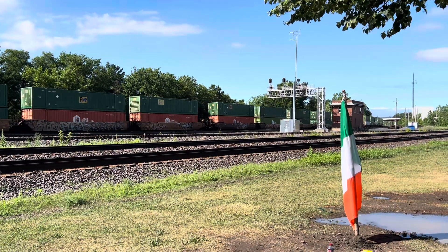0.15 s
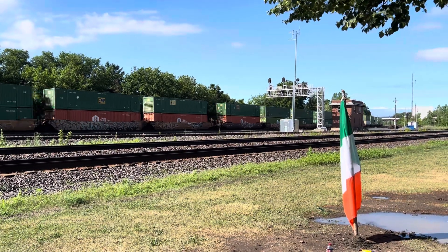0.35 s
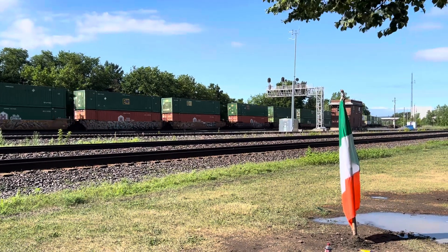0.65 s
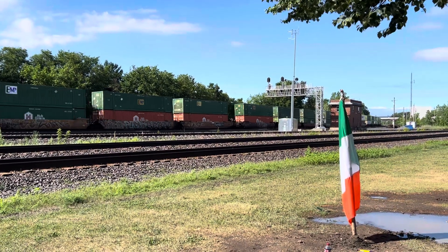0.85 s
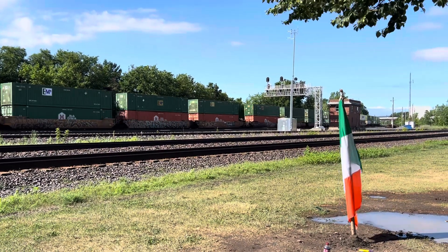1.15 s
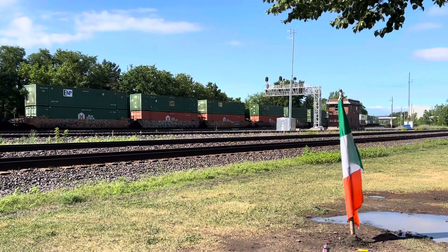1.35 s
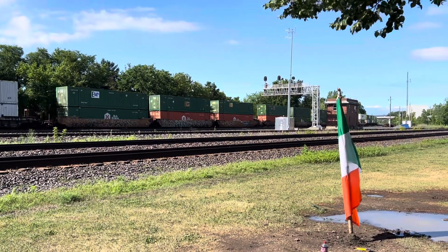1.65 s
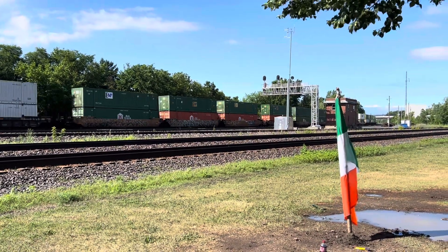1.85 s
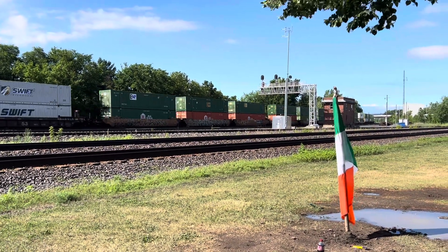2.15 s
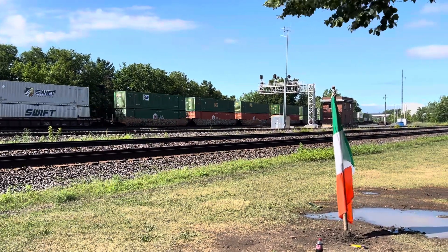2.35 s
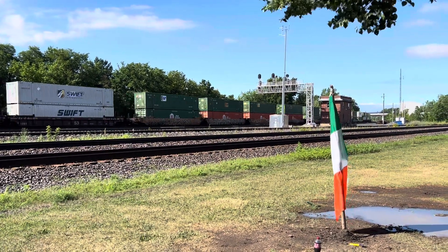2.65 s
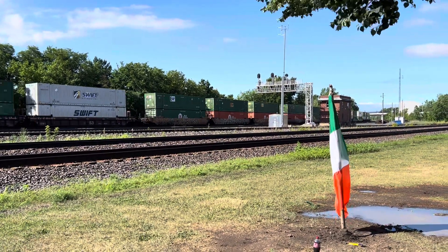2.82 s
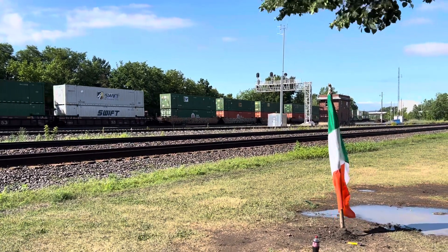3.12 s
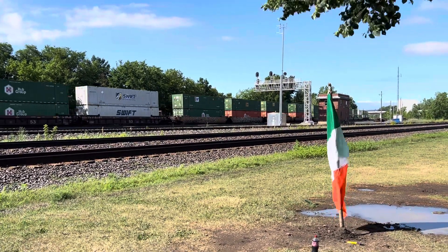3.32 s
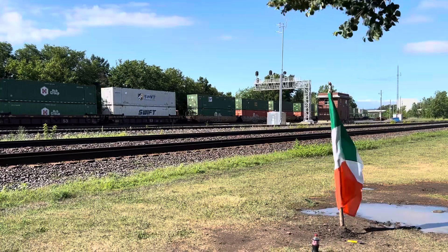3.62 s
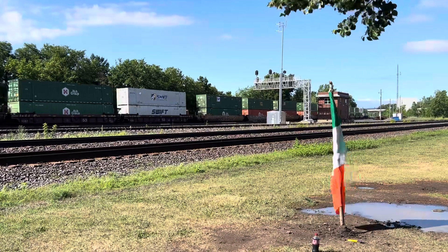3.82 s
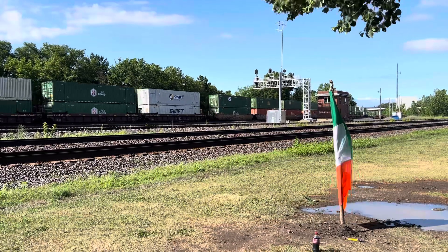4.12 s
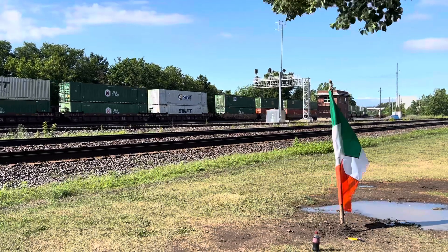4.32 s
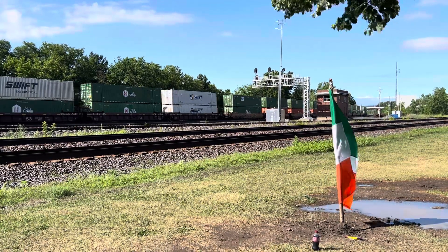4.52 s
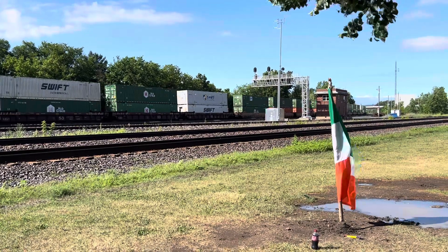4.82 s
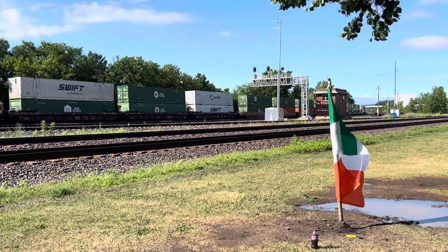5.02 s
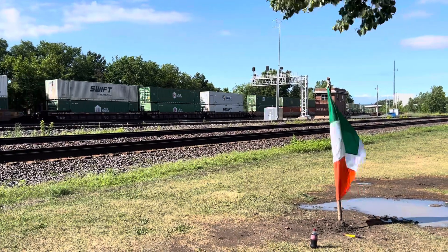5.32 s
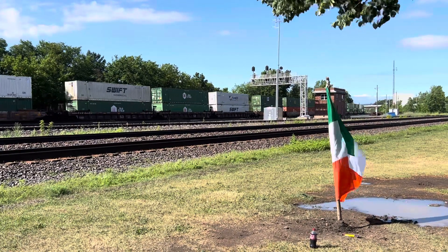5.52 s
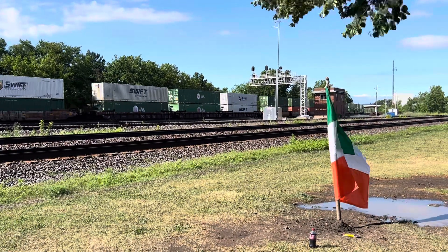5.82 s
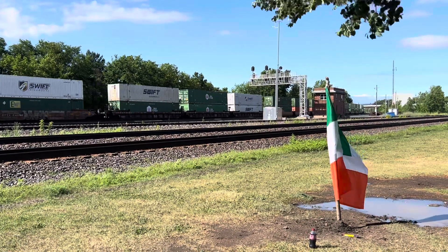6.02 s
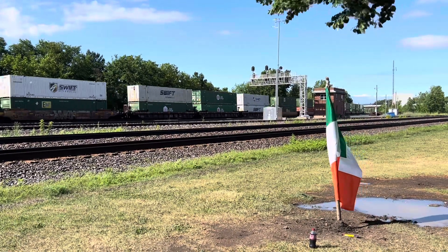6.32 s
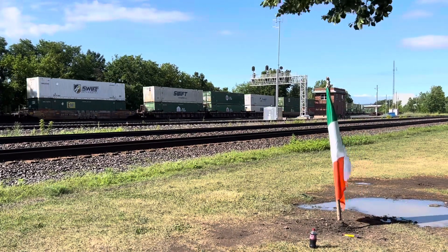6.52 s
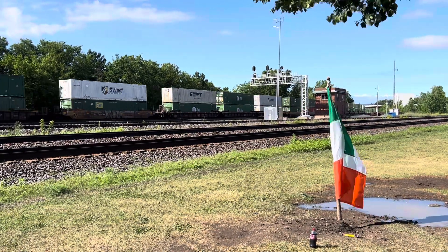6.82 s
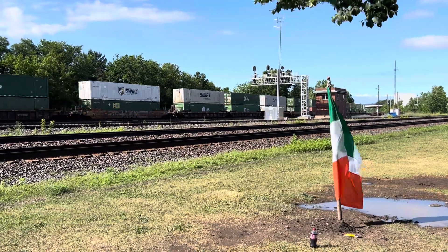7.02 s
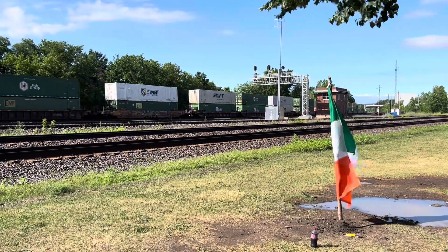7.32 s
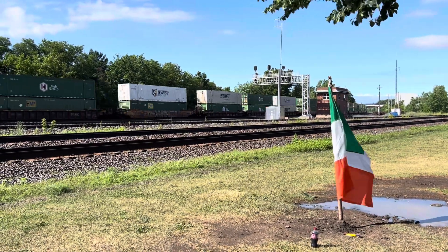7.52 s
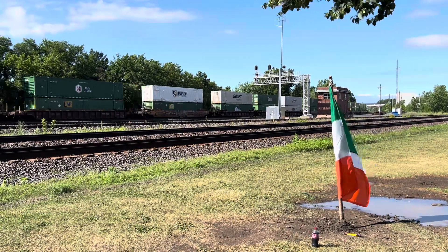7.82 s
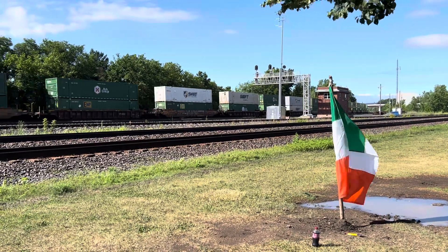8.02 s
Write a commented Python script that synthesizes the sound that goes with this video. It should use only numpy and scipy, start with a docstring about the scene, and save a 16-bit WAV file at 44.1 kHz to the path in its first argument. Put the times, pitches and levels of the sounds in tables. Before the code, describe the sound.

A container train rolls past at a distance with low rumble and broad wheel roar, piercing wobbling flange squeals, and wind thumping a hand-held microphone.

```python
"""Beside a railway curve on a breezy day, a container train rolls by some tracks away.
Shaped noise makes the rumble and hollow boom of the wagons, the roar of the wheels and the scrape of flanges.
One wheel after another squeals: a set of wavering tones that swell with the pressure on the rail.
Noise gusts, and short swings of air slap a nearby flag and the two ports of a hand-held microphone."""
import sys
import numpy as np
from scipy import signal
from scipy.fft import rfft, irfft, next_fast_len
from scipy.io import wavfile
from scipy.ndimage import uniform_filter1d, map_coordinates

SR = 44100
rng = np.random.default_rng(int(sys.argv[2]) if len(sys.argv) > 2 else 0)


def master_out(mix):
    """Clip the mix to full scale and print it as 16-bit PCM to the path in sys.argv[1]."""
    frames = np.transpose(np.atleast_2d(mix))
    ceiling = np.clip(frames, -1, 1)
    pcm = np.round(ceiling * 32767).astype(np.int16)
    wavfile.write(sys.argv[1], SR, pcm)


N = 359856

# How loudly the wheels roll on the rails. Each row: time in seconds, relative level in dB.
ROLLING = [(0.02, -40.5), (0.11, -37), (0.13, -40), (0.4, -46), (1.35, -42.5), (2.23, -45), (2.66, -42.5),
           (4.17, -42.5), (4.53, -46.5), (5.05, -42.5), (5.63, -42.5), (6.33, -43), (7.44, -43.5),
           (7.85, -41), (7.87, -42.5), (8.12, -45)]
# The modes (natural tones) of each squealing wheel. Each row: pitch in Hz, relative level in dB.
WHEEL_A = [(895, -43), (1948, -52), (2500, -45.5), (4183, -49), (4877, -53), (5001, -46), (5100, -44)]
WHEEL_B = [(2660, -46), (3800, -50), (4608, -49), (7708, -64), (8580, -51), (9485, -63), (12618, -62)]
WHEEL_C = [(1795, -43), (1860, -43), (3229, -39.5), (3854, -45), (4035, -38), (4108, -46), (4841, -50),
           (4907, -41), (4993, -42.5), (5789, -40), (6675, -39), (6780, -45), (7558, -39), (7680, -49),
           (8445, -37), (8578, -43), (9328, -41), (9500, -52), (10230, -39), (11125, -35), (12005, -41),
           (12900, -45), (13770, -50), (14655, -48)]
WHEEL_D = [(1660, -43), (1900, -41), (2440, -44), (3159, -36), (4008, -33.5), (4088, -40), (4338, -50),
           (4884, -36), (4946, -41), (5738, -37), (5840, -46), (6621, -41), (6728, -41), (7504, -37),
           (7618, -39.5), (8385, -37), (8527, -40), (9262, -35.5), (9400, -42), (11040, -45), (11945, -48),
           (12370, -55), (12812, -50)]
WHEEL_E = [(4812, -42), (5372, -47.5), (11757, -55), (14427, -52)]
WHEEL_F = [(1690, -47), (1752, -43), (1798, -38.5), (2648, -47), (2728, -42), (3628, -44), (7400, -55.5),
           (8441, -50)]
WHEEL_G = [(1744, -44), (2600, -51), (6158, -45), (7138, -51), (7251, -59), (8129, -48), (8263, -57),
           (11175, -54), (13227, -57), (13431, -56)]
WHEEL_H = [(1725, -38.5), (2532, -46), (3305, -43), (3364, -36), (3440, -30), (3812, -47), (4180, -45),
           (4245, -43), (4322, -42), (4400, -47), (4780, -48), (5010, -44), (5165, -39), (5225, -43),
           (5380, -48), (5490, -47), (5922, -41), (6045, -44), (6165, -44), (6290, -49), (7035, -37),
           (7170, -47), (8021, -33), (8602, -39), (9018, -34), (9636, -42), (12025, -42)]
WHEEL_I = [(2540, -45), (3294, -46), (3435, -42), (3680, -41), (4260, -48), (4490, -50), (5087, -41.5),
           (5240, -43), (6072, -48), (6180, -45), (7014, -44), (7983, -39), (8140, -48), (8990, -42),
           (12010, -51)]
WHEEL_J = [(4468, -44), (4600, -47), (8102, -59)]
WHEEL_K = [(2783, -47), (3451, -50), (7332, -52)]
# Flanges (wheel rims) meeting the rail. Each row: start in seconds, attack in seconds, hold in seconds,
# relative rubbing level in dB, growth while held in dB per second, release in dB per second,
# relative squeal level in dB, roughness from 0 to about 1, the wheel's modes (empty: no squeal).
CONTACTS = [(0.027, 0.067, 0.031, -38, -1.5, 29, -1, 0.9, WHEEL_A), (0.6, 0.05, .02, -48, 0, 71, 0, 0, []),
            (0.815, 0.05, 0.11, -39.5, 0, 61, -5, 0.78, WHEEL_B),
            (1.3, 0.13, 0.035, -45.5, -6, 54, 0, 0, []), (2.05, .05, .03, -51, 0, 52, 0, 0, []),
            (2.222, 0.14, 0.367, -33.5, 15.5, 73, -0.5, 0.47, WHEEL_C),
            (2.97, 0.058, 0.183, -28.5, -0.5, 47, -1, 0.5, WHEEL_D),
            (3.47, 0.11, 0.049, -45, -0.5, 83, -2.5, 0.28, WHEEL_E),
            (3.728, 0.12, 0.097, -39.5, -1, 59, -0.5, 0.74, WHEEL_F),
            (4.172, 0.057, 0.18, -45, -11, 22, -12, 1.02, WHEEL_J),
            (5.085, 0.047, 0.017, -42.5, 0, 74, -3.5, 0.74, WHEEL_K),
            (6.05, 0.061, 0.072, -49, 4, 64, -9, 0.93, WHEEL_J),
            (6.42, 0.037, 0.086, -45.5, -9, 33, 0, 0, []),
            (6.812, 0.051, 0.021, -42.5, -5, 60, -1, 0.78, WHEEL_G),
            (7.232, .115, .458, -34, 12, 85, -0.5, .78, WHEEL_H),
            (7.85, 0.2, 0.06, -37.5, -7, 50, -2, 0.9, WHEEL_I)]
# The breeze at the microphone. Each row: time in seconds, strength in dB.
WIND = [(0.05, -37), (0.45, -35), (1.37, -35), (2.09, -38), (2.48, -34), (2.84, -38), (3.53, -28.5),
        (4.42, -33), (4.6, -35.5), (5.47, -37), (5.94, -37.5), (6.25, -31.5), (6.6, -35), (8.12, -37.5)]
BREEZE_DB = -36.5  # strength of the ordinary breeze


def amp(db):
    """Turn decibels into a gain."""
    return np.exp(np.asarray(db) * (np.log(10) / 20))


def unit(x):
    """Scale to an average strength (rms) of 1."""
    return x / np.sqrt(np.mean(np.abs(x) ** 2) + 1e-20)


def along(points, hz, axis=1):
    """Read one column of a frequency table, on a log frequency axis."""
    table = np.transpose(points)
    return np.interp(np.log(hz + 1), np.log(table[0] + 1), table[axis])


def curve(rows):
    """Join rows of time and value into one value per sample."""
    return np.interp(np.arange(N) / SR, *np.transpose(rows))


def wobble(rate):
    """Draw a smooth random curve with this many random points a second."""
    coarse = np.arange(0, N + 32, 32)
    knots = rng.standard_normal(8192)
    smooth = map_coordinates(knots, [coarse * rate / SR], mode="mirror")
    return np.interp(np.arange(N), coarse, smooth)


def filtered(x, response):
    """Strengthen or weaken each frequency of x by the given response."""
    size = x.shape[-1]
    padded = next_fast_len(size + 8192)
    spectrum = rfft(x, padded) * response(np.fft.rfftfreq(padded, 1 / SR))
    return irfft(spectrum, padded)[..., :size]


def coloured(x, spectrum):
    """Give x a tone colour, at rms 1."""
    return unit(filtered(x, lambda hz: amp(along(spectrum, hz))))


def noise_pair():
    """Two unrelated steady noises."""
    return rng.standard_normal((2, N))


def patchy(depth_db):
    """Two unrelated noises whose level drifts in the same patches of time and frequency."""
    z = signal.stft(noise_pair(), nperseg=1024)[2]
    field = uniform_filter1d(rng.standard_normal(z.shape[1:]), size=5, axis=0)  # smooth over frequency
    field = uniform_filter1d(field, size=14, axis=1)  # smooth over time
    return signal.istft(z * amp(depth_db * unit(field)), nperseg=1024)[1][:, :N]


def rumble():
    """Heavy wagons and moving air shake the bass: deep noise that drops abruptly halfway."""
    # Each row: time in seconds, relative level in dB.
    level_rows = [(0.05, -20), (0.77, -22.5), (2.25, -23), (2.55, -22), (3.2, -19), (3.4, -22.5),
                  (3.91, -21.5), (3.96, -30.5), (6.93, -28.5), (7.15, -31.5), (8.05, -30), (8.12, -21.5)]
    # Each row: frequency in Hz, relative level in dB per Hz.
    deep = [(15, -45), (28, -18), (42, -10.5), (58, 1), (85, 0.5), (125, -3.5), (180, -16.5), (250, -19.5),
            (330, -41.5), (700, -75)]
    level_db = curve(level_rows) + 1.5 + 1.37 * wobble(12)
    return amp(level_db) * coloured(noise_pair(), deep)


def boom():
    """The first wagons drone with a hollow, uneven boom: noise in a narrow low band."""
    # Each row: time in seconds, level in dB before the unevenness.
    level_rows = [(0.05, -37), (0.9, -36), (1.15, -30), (1.5, -32), (1.85, -30), (2.2, -34), (2.7, -37),
                  (3.0, -39), (4.0, -61)]
    # Each row: frequency in Hz, relative level in dB per Hz.
    hollow = [(80, -31), (130, 1), (220, -3), (310, -26), (600, -66)]
    level_db = curve(level_rows) + 2.4 * wobble(14)
    return amp(level_db) * coloured(noise_pair(), hollow)


def rolling():
    """Rough treads make a broad roar and keep the wheels' resonances ringing."""
    # Each row: frequency in Hz, relative level in dB per Hz.
    roar_spectrum = [(150, -9.5), (450, -2.5), (650, -2), (900, -0.5), (1400, -1.5), (1600, -3),
                     (1800, -7.5), (2150, -10.5), (2650, -10), (3300, -14), (5000, -18), (7500, -28),
                     (12000, -41.5), (16000, -65)]
    # Resonances. Each row: centre in Hz, width in Hz, relative level in dB.
    resonances = [(1760, 110, 1), (1917, 180, 2), (2570, 190, -8), (2740, 110, -5), (3420, 92, -6.5)]

    def ring_response(hz):
        return sum(amp(db) / (1 + (2 * (hz - centre) / width) ** 2) for centre, width, db in resonances)

    roar = amp(9.5) * coloured(patchy(depth_db=1.67), roar_spectrum)
    ring = unit(filtered(patchy(depth_db=2.0), ring_response))
    ring_db = 0.35 + 0.73 * wobble(5.3)
    return amp(curve(ROLLING)) * (roar + amp(ring_db) * ring)


def pressure(start, attack, hold, growth, release):
    """How hard one flange bears on the rail, in samples and dB: it bites, holds or changes, and lets go."""
    onset_db = 22  # how far below full bite the contact is at its start
    first = max(0, int((start - attack / 2) * SR))
    last = min(N, int((start + attack + hold + 32 / release) * SR))
    span = np.arange(first, last)
    t = span / SR - start
    bite_db = onset_db * np.maximum(1 - t / attack, 0) ** 2
    held_db = growth * np.clip(t - attack, 0, hold)
    release_db = release * np.maximum(t - attack - hold, 0)
    return span, held_db - bite_db - release_db


def rubbing_db():
    """Add up the power of all flanges rubbing together, as an unsteady level in dB."""
    light_rub_db = -11  # wheels that only brush the rail, relative to the rolling
    waver_db = 2.5
    power = amp(curve(ROLLING) + light_rub_db) ** 2
    for start, attack, hold, db, growth, release, *_ in CONTACTS:
        span, press_db = pressure(start, attack, hold, growth, release)
        power[span] += amp(db + press_db) ** 2
    return 10 * np.log10(power) + waver_db * wobble(18)


def scraping():
    """Flanges grind on the rail head: patchy hiss, which grows less than the rubbing as tone takes over."""
    # Each row: frequency in Hz, relative level in dB per Hz.
    scrape_spectrum = [(900, -12), (1800, -3), (2600, -4.5), (4000, -5), (6000, -7.5), (8000, -5.5),
                       (10000, -13), (13000, -7.5), (16000, -20.5)]
    rub_db = rubbing_db()
    hiss_db = rub_db + 3.0 - 0.3 * np.maximum(rub_db + 40.5, 0)
    hiss = coloured(patchy(depth_db=3.0), scrape_spectrum)
    # a light touch excites less of the highest treble than a hard one
    treble = filtered(hiss, lambda hz: 1 / (1 + (9000 / (hz + 1)) ** 8))
    softness = np.clip((-30.5 - rub_db) / 22, 0, .58)
    return amp(hiss_db) * (hiss - softness * treble)


def mode_tone(hz, size, flutter, swell_db, wander, skirt_hz):
    """One mode as the flange sticks and slips: a wavering, swelling tone inside a skirt of narrow noise."""
    t = np.arange(size) / SR

    def drift(rate):
        return np.interp(t * rate, np.arange(1024), rng.standard_normal(1024))

    pitch = hz * (1 + wander * flutter * drift(25.3))
    turn = np.exp(2j * np.pi * np.cumsum(pitch) / SR)
    skirt = np.array([drift(skirt_hz) + 1j * drift(skirt_hz) for side in range(2)])
    core = np.exp(2j * np.pi * rng.random((2, 1)))  # a random starting phase on each side
    tone = np.real(turn * (core + flutter * skirt))
    return unit(amp(swell_db * drift(24.0)) * tone)


def squeals():
    """Each wheel sings while its flange binds, following the pressure; modes surge and pitches sink."""
    # Moments when a mode takes over, or drops out if the rise is negative.
    # Each row: middle in seconds, pitch in Hz, relative rise in dB, length in seconds.
    surges = [(0.092, 5050, 15, 0.06), (0.22, 5050, 7, .07), (0.32, 5050, 5, .1), (0.15, 4188, 3, 0.23),
              (0.12, 2500, 6, .2), (0.852, 2660, 20, .04), (2.28, 3230, 14, .06), (2.41, 3230, -11, .05),
              (2.475, 3230, 17, 0.04), (2.53, 3854, 7, 0.095), (2.705, 4070, 14, .1),
              (2.88, 4070, 7, 0.065), (2.37, 4950, 4, .06), (2.73, 4950, 6, .2), (2.5, 5789, 7, .07),
              (2.69, 5789, 12, 0.24), (2.36, 6675, 12, 0.076), (2.48, 6675, 13, .08), (2.73, 6675, 8, .1),
              (2.44, 7558, 11, .1), (2.72, 7558, 6, .1), (2.37, 8445, 13, .05), (2.58, 8445, 4, .1),
              (2.73, 8445, 8, 0.14), (2.71, 11125, 8, 0.18), (3.05, 3159, 14, .075),
              (3.047, 4050, 14.5, .06), (3.17, 4050, 7, .08), (3.37, 4050, 5, .08), (3.05, 5738, 4, .05),
              (3.075, 4915, 5, .045), (3.175, 4915, 4, .05), (3.18, 5738, 13, 0.081),
              (3.39, 5738, 17.5, .08), (3.2, 7560, 4, 0.11), (3.04, 8385, 16, .07), (3.15, 9262, 4, .12),
              (3.63, 4812, 6, .1), (3.86, 2690, 11, 0.079), (3.89, 3628, 12, 0.065), (3.98, 1720, 12, 0.12),
              (6.885, 6158, 11, .09), (6.88, 8129, 8, .08), (7.41, 1725, 8.5, 0.09), (7.36, 2532, 11, .1),
              (7.79, 2532, 8, .1), (7.41, 3440, 8, 0.061), (7.51, 3440, 5, 0.12), (7.65, 3364, 7, .09),
              (7.78, 3335, 12, 0.12), (7.79, 3440, 5, 0.078), (7.49, 3812, 13, .09), (7.76, 4280, 6, .1),
              (7.41, 5225, 10.5, 0.11), (7.77, 5165, 10, .09), (7.63, 5922, 13, .12), (7.78, 6165, 6, .1),
              (7.52, 8021, 12, 0.084), (7.7, 8021, 7, .2), (7.77, 7035, 5.5, 0.12), (7.79, 8602, 10, 0.098),
              (7.75, 9018, 9.5, 0.14), (7.79, 12025, 5, .1), (7.94, 3678, 9, .14), (7.99, 3425, 10, .12)]
    surge_width_hz = 65  # modes this close to a surge's pitch surge together
    squeal_range_db = 16  # a wheel sings only this close to its hardest pressure
    skirt_rate, rough_rate = 44.8, 90.1  # random points a second: basic, and added by roughness
    # modes gain this much per octave above the pivot as a squeal goes on, and fade below it
    climb_db_per_s, pivot_hz = 12.5, 6460
    sink_per_s = .011  # each wheel turns away from the listener: share of the pitch lost a second
    out = np.zeros((2, N))
    for start, attack, hold, _, growth, release, db, flutter, modes in CONTACTS:
        span, press_db = pressure(start, attack, hold, growth, release)
        binds = press_db >= press_db.max() - squeal_range_db
        span, press_db = span[binds], press_db[binds]
        t = span / SR
        gate = signal.windows.tukey(len(span), .12)
        doppler = 1 - sink_per_s * (t - start - attack - hold)
        skirt_hz = skirt_rate + rough_rate * flutter ** 2
        for hz, mode_db in modes:
            surge_db = sum(rise / (1 + (2 * (t - middle) / length) ** 4)
                           for middle, centre, rise, length in surges if abs(hz - centre) < surge_width_hz)
            climb_db = climb_db_per_s * np.log2(hz / pivot_hz) * np.minimum(t - start, attack + hold)
            drive = unit(gate * amp(press_db + surge_db + climb_db))
            tone = mode_tone(hz * doppler, len(t), flutter, swell_db=1.6, wander=0.00178, skirt_hz=skirt_hz)
            out[:, span[0]:span[-1] + 1] += amp(db + mode_db) * drive * tone
    return out


def gusts():
    """Lumpy low gusts at the microphone: uneven bass noise that follows the breeze."""
    # Each row: frequency in Hz, relative level in dB per Hz.
    gust_spectrum = [(20, -28), (60, -13), (130, -4.5), (200, -0.5), (300, -7.5), (460, -11.5), (700, -22),
                     (1200, -29), (3000, -53)]
    # -31.5 dB in the ordinary breeze, growing 0.67 dB per dB of strength
    level_db = -31.5 + 0.67 * (curve(WIND) - BREEZE_DB)
    return amp(level_db) * unit(amp(2.2 * wobble(30)) * coloured(noise_pair(), gust_spectrum))


def rush():
    """Stronger gusts add a ragged, brighter rush of noise, which grows faster than the low gusts."""
    # Each row: frequency in Hz, relative level in dB per Hz.
    air_spectrum = [(200, -23), (380, 2), (470, 4.5), (650, -1.5), (900, -6), (1500, -39), (3000, -60)]
    # -45 dB in the ordinary breeze, growing 1.87 dB per dB of strength
    level_db = -45 + 1.87 * (curve(WIND) - BREEZE_DB)
    return amp(level_db) * unit(amp(4.4 * wobble(45)) * coloured(noise_pair(), air_spectrum))


def buffets():
    """Gusts slap a nearby flag and the microphone: one short swing of air inside a ruffle of noise."""
    # Each row: start in seconds, relative strength in dB, rise in seconds, pitch in Hz.
    slaps = [(3.014, -10, .009, 450), (3.193, -6.5, 0.0079, 257), (3.325, -6, .012, 95),
             (3.356, -20, .006, 430), (3.43, -17, 0.0057, 300), (3.523, -6, 0.0067, 170),
             (3.563, -10.5, 0.0069, 380), (3.577, -6.5, 0.0049, 207), (3.634, -19, 0.011, 640),
             (3.684, -16, .006, 380), (3.715, -8, 0.012, 110), (3.781, -17, .005, 440),
             (3.797, -10.5, 0.0075, 125), (3.822, -21, .006, 330), (3.858, -15, .009, 85),
             (3.902, -9, 0.0075, 110), (3.968, -21, 0.0055, 480), (4.083, -18, 0.0048, 290),
             (4.116, -20, 0.0037, 720), (4.254, -13.5, .006, 400), (4.266, -9.5, .005, 290),
             (4.285, -10.5, 0.0051, 170), (4.414, -18.5, .008, 380), (4.456, -10.5, .0046, 290),
             (4.479, -8.5, 0.0043, 258), (4.537, -23, 0.0049, 260), (4.69, -17.5, 0.006, 220),
             (4.83, -15.5, 0.0053, 250), (5.044, -17, 0.0043, 260), (5.155, -16, 0.0091, 250),
             (5.351, -19, 0.0049, 310), (5.517, -15, 0.004, 380), (5.64, -15, 0.0055, 310),
             (5.696, -18, 0.0047, 250), (6.09, -20, 0.0078, 230), (6.121, -19, 0.0052, 200),
             (6.164, -18, 0.0052, 290), (6.224, -13.5, 0.0057, 190), (6.248, -9.5, 0.0046, 278),
             (6.305, -22, 0.0091, 680), (6.34, -22, .007, 480), (6.39, -13.5, 0.0042, 320),
             (6.505, -14.5, 0.0062, 350), (6.607, -14, 0.0046, 200), (6.691, -24, 0.0042, 250),
             (6.735, -17.5, 0.0046, 241), (6.818, -20, .005, 220), (7.175, -20, 0.0051, 240),
             (7.416, -19, 0.0049, 260), (7.685, -19, 0.0053, 240)]
    # Each row: frequency in Hz for a 250 Hz slap, relative level in dB per Hz.
    thump = [(15, -32), (40, -10), (110, -1), (230, -1.5), (380, -12.5), (600, -17), (1200, -40),
             (4000, -64)]
    thump_hz, snap_cycles, ruffle_db = 250, 0.65, -3
    out = np.zeros((2, N))
    t = np.arange(SR // 8) / SR
    for start, db, rise, hz in slaps:
        spectrum = [(f * hz / thump_hz, level) for f, level in thump]  # moved to this slap's pitch
        swell = t / rise * np.exp(1 - t / rise)
        ruffle = swell * coloured(rng.standard_normal((2, len(t))), spectrum)
        ruffle /= np.abs(ruffle).max(axis=1, keepdims=True)
        cycles = (t - rise) * hz
        swing = np.sin(2 * np.pi * (cycles + rng.random((2, 1))))
        snap = np.exp(-(cycles / snap_cycles) ** 2) * swing
        out[:, int(start * SR):][:, :len(t)] += amp(db - 1.5) * (snap + amp(ruffle_db) * ruffle)
    return out


def ports(pair):
    """Mix two unrelated signals into left and right, with the microphone pair's likeness, balance and phase."""
    # Each row: frequency in Hz, likeness (coherence) from 0 to 1, left minus right in dB,
    # lead of the left in radians.
    port_rows = [(35, 0.97, 0.1, 0.0), (80, 0.87, 0.2, 0.0), (330, 0.68, 0.3, 0.3), (520, 0.52, 1.5, 0.9),
                 (850, 0.57, 2.8, 2.0), (1150, 0.64, -2.8, 2.9), (1500, 0.8, -3.6, 4.0),
                 (1750, 0.89, 0.9, 6.7), (2300, 0.77, 3.9, 6.8), (3400, 0.8, 2.6, 6.6),
                 (4600, 0.8, 1.2, 6.5), (5500, 0.61, 1.2, 5.8), (6500, 0.98, 0.2, 6.3),
                 (7500, 0.89, 0.2, 6.0), (8800, 0.85, -0.1, 4.3), (9350, 0.98, 0.0, 3.2),
                 (10700, 0.99, 0.0, 3.1), (11400, 0.7, 0.0, 1.6), (12100, 0.95, 0.0, 0.0),
                 (13300, 0.95, 0.0, -0.1), (14400, 0.75, 0.0, -1.7), (15000, 0.95, 0.0, -3.1)]

    def shares(hz):
        angle = np.arccos(np.clip(along(port_rows, hz), 0, 1)) / 2
        return np.array([np.cos(angle), np.sin(angle)])

    def balance_and_lead(hz):
        balance = amp(np.outer([.5, -.5], along(port_rows, hz, axis=2)))
        lead = np.exp(1j * np.outer([.5, -.5], along(port_rows, hz, axis=3)))
        return balance * lead

    common, apart = filtered(pair, shares)
    return filtered(np.array([common + apart, common - apart]), balance_and_lead)


def scene():
    """Add train and wind together, as they reach the microphone."""
    train = rumble() + boom() + rolling() + scraping() + squeals()
    wind = gusts() + rush() + buffets()
    return ports(train + wind)


def record(dry):
    """The recorder keeps nothing at or above its band limit of 15700 Hz."""
    return filtered(dry, lambda hz: hz < 15700)


dry = scene()
out = record(dry)
master_out(out)
```